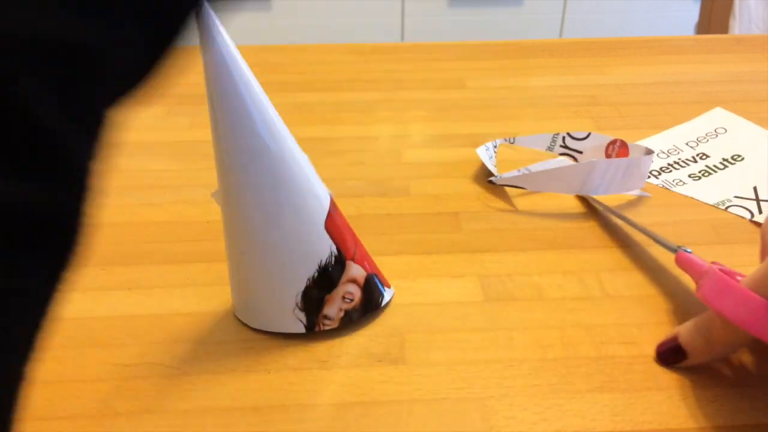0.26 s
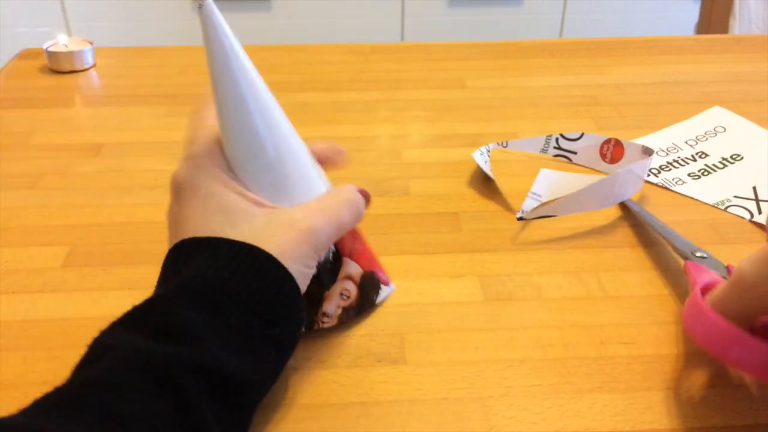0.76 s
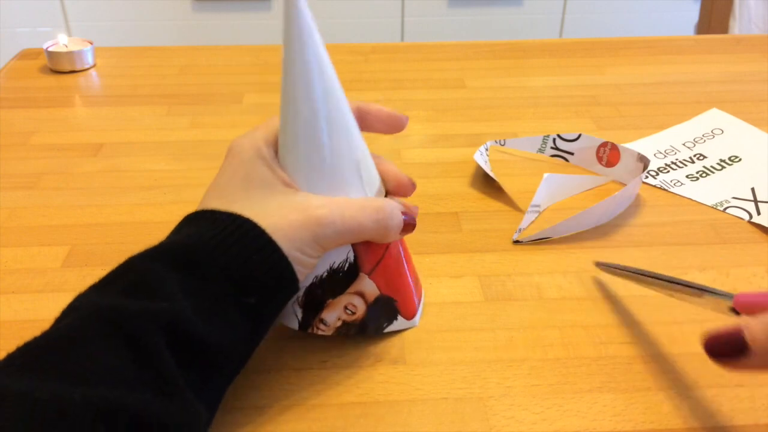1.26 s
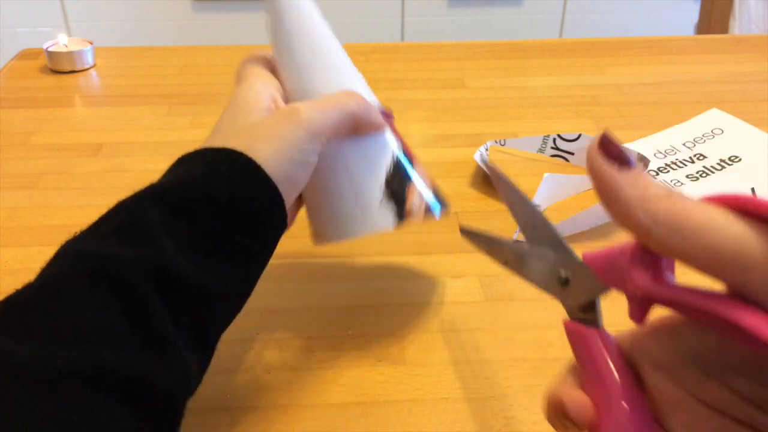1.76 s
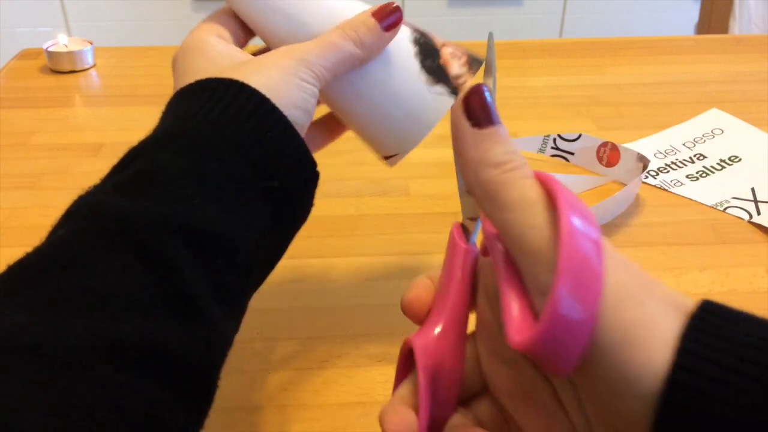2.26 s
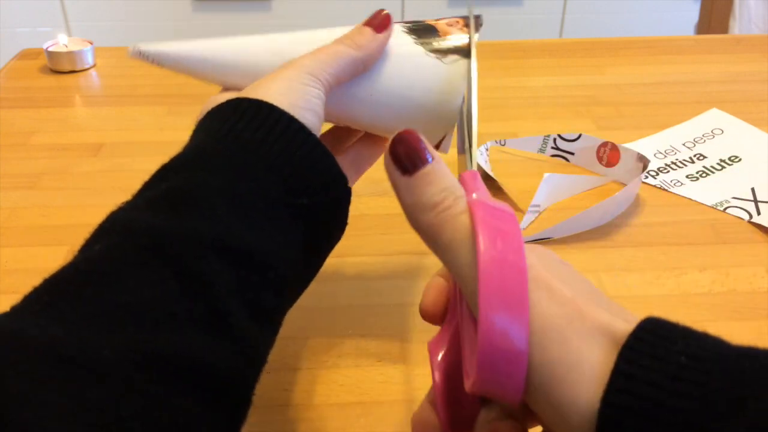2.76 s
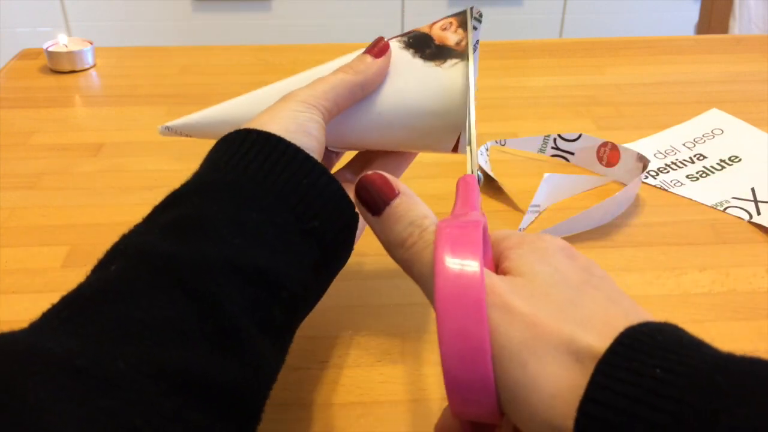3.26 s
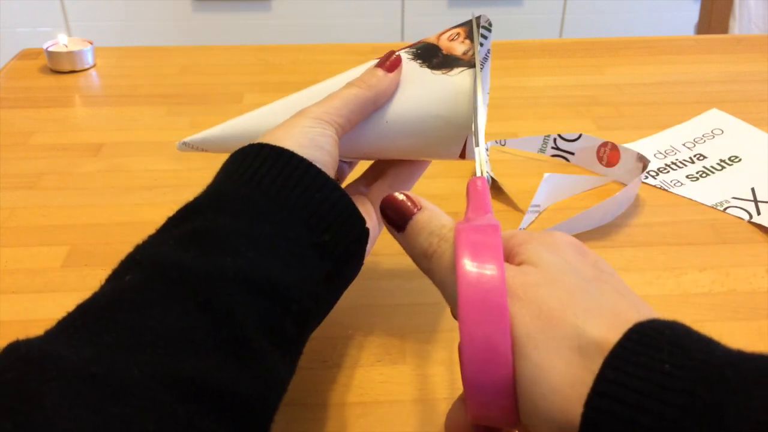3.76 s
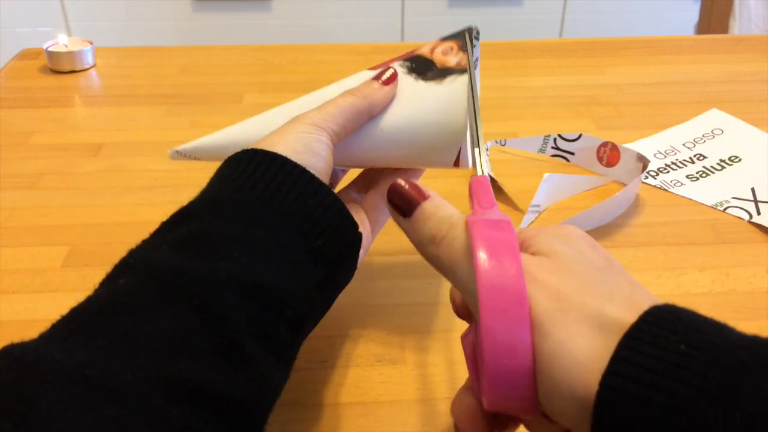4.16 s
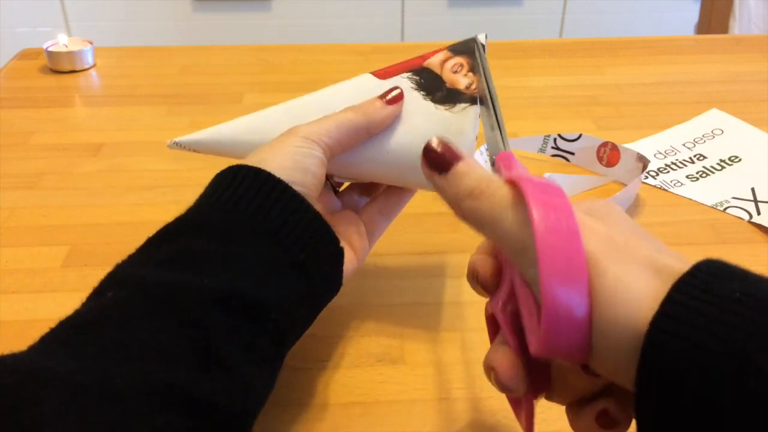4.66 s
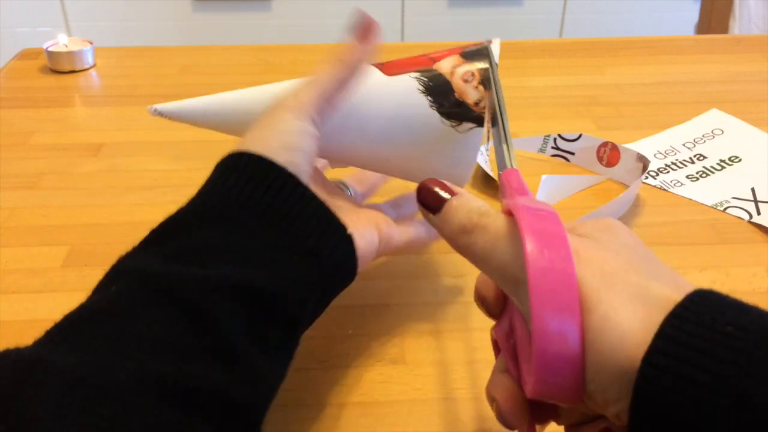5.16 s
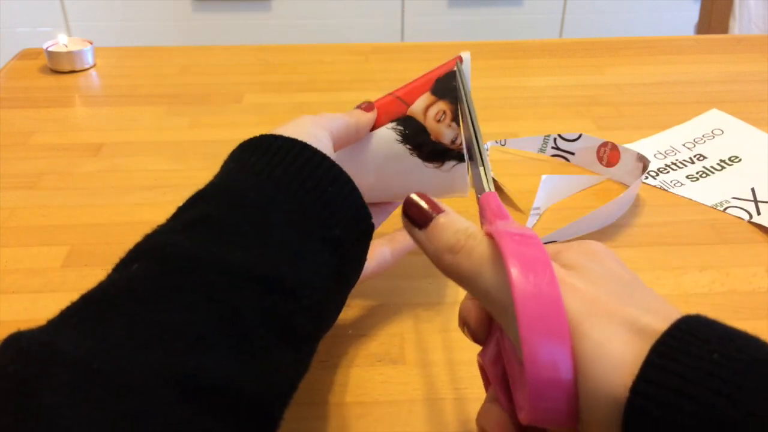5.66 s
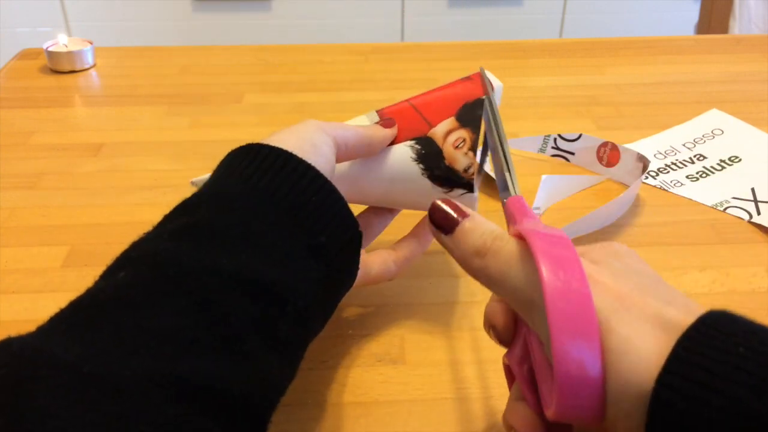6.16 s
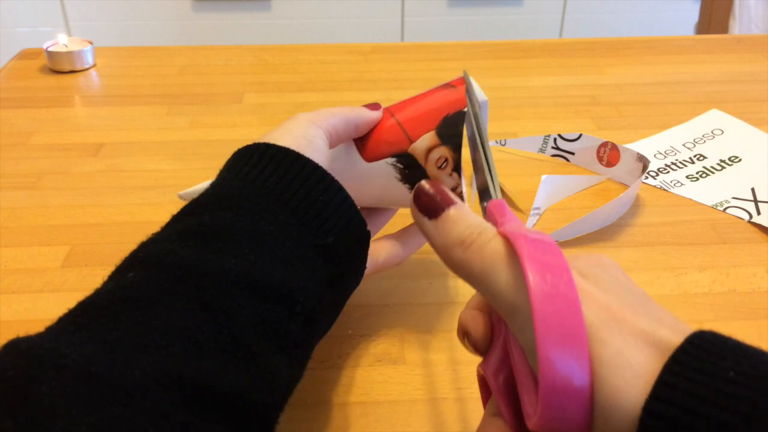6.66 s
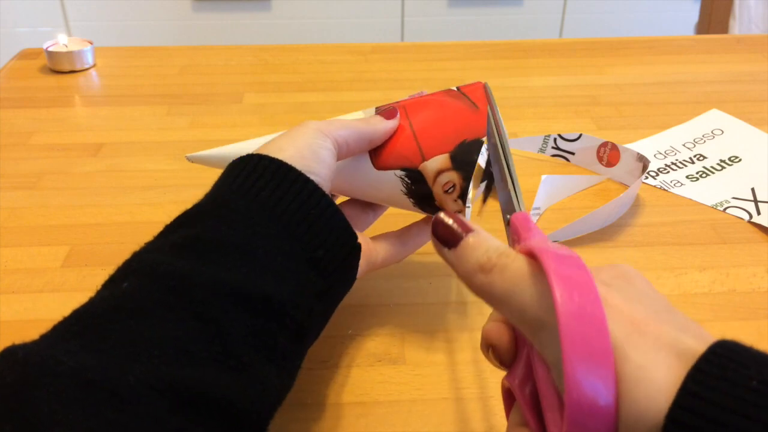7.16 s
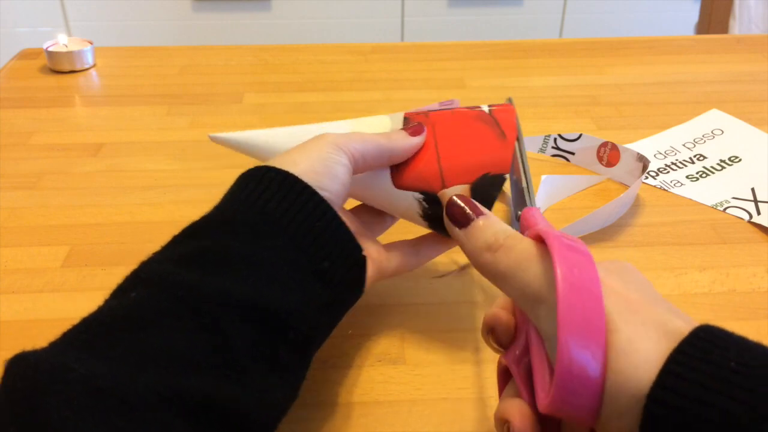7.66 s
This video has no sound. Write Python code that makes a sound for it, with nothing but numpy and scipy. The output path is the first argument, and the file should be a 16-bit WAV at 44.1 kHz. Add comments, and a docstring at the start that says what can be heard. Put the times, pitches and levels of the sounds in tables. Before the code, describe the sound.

Scissors crunch and snap in uneven bursts through a rolled paper cone, with hollow papery pops and faint blade rasps in a small quiet room.

```python
"""Large scissors trim the rim of a paper cone, close by in a small room, after it is picked up from a wooden table.
Each cut is a run of crunching slips and loud snaps: bursts of random clicks, each with a pop of the cone.
Between cuts the blades slide with a soft rasp: finer random clicks that ring the steel and the cone.
Sleeve and fingers brush the paper (crackling friction), bump it (short rings with a thud) and make it hum."""
import sys
import numpy as np
from scipy import signal
from scipy.fft import rfft, irfft
from scipy.io import wavfile

SR = 44100
rng = np.random.default_rng(int(sys.argv[2]) if len(sys.argv) > 2 else 0)


def dump_mix(stems):
    """Bounce the given channels to the path in sys.argv[1] as a 16-bit WAV at rate SR."""
    frames = np.atleast_2d(stems).T  # one column per channel
    limited = np.clip(frames, -1, 1)  # hard clip at full scale
    pcm = np.round(limited * 32767).astype(np.int16)
    wavfile.write(sys.argv[1], SR, pcm)


N = 348345


def from_db(db):
    """Turn decibels into a gain."""
    return 10 ** (np.asarray(db) / 20)


def rms_one(x):
    """Scale a sound to an average strength (rms) of 1."""
    return x / np.sqrt(np.mean(x ** 2) + 1e-20)


def at_hz(points, hz, axis=1):
    """Read one column of a table between its rows, along a logarithmic pitch axis."""
    table = np.array(points)
    return np.interp(np.log(np.maximum(hz, 1)), np.log(table[:, 0]), table[:, axis])


def add(track, start_s, sound):
    """Mix a short sound into a track."""
    i = max(0, round(start_s * SR))
    track[i:i + len(sound)] += sound[:max(0, N - i)]


def colour(x, spectrum, bright_db=0, size=4096):
    """Shape the spectrum without sounding early (minimum phase), tilted by bright_db per octave."""
    hz = np.arange(size // 2 + 1) * SR / size
    octaves = np.clip(np.log2(np.maximum(hz, 1) / 3600), -1.0, 1.2)   # the tilt levels off outside this range
    cepstrum = irfft(np.log(from_db(at_hz(spectrum, hz) + bright_db * octaves)))
    # folding the cepstrum puts all of the filter's response after the input
    cepstrum[1:size // 2] *= 2
    cepstrum[size // 2 + 1:] = 0
    response = irfft(np.exp(rfft(cepstrum)))
    return signal.oaconvolve(x, response)[:len(x)]


def resonate(x, hz, q):
    """Let through a narrow peak around one pitch."""
    return signal.lfilter(*signal.iirpeak(hz, q, fs=SR), x)


def butter(x, hz, kind):
    """Gentle second-order filter."""
    return signal.sosfilt(signal.butter(2, hz, kind, fs=SR, output="sos"), x)


def drift(rate):
    """Random curve with a spread of about 1: `rate` new values per second, joined by straight lines."""
    return np.interp(np.arange(N) * rate / SR, np.arange(N), rng.standard_normal(N))


def ring(x, hz, t60):
    """One resonance: a unit click sets off a sine of height 1 that dies by 60 dB in t60 seconds."""
    r, w = from_db(-60 / (t60 * SR)), 2 * np.pi * hz / SR
    return signal.lfilter([0, np.sin(w)], [1, -2 * r * np.cos(w), r * r], x + 1e-18)


def grains(per_s, spread_db, size):
    """Tiny slips and fibre breaks: random clicks of uneven strength."""
    strength = from_db(spread_db * np.minimum(rng.exponential(1, size), 4))
    happens = rng.random(size) < per_s / SR
    return happens * strength * rng.choice([-1, 1], size)


CRINKLE_DB, CRINKLE_PER_S = 4, 45   # the paper's colour shifts as it flexes: spread, new values per second
SNAGS_PER_S, SNAG_DB = 110, -3.5   # the paper's edge crackles under the brushing hand


def crinkle(count=12):
    """Dense grains of friction with a few snags; each band swells and sinks on its own."""
    out = np.zeros(N)
    edges = np.geomspace(200, 16000, count + 1)
    snags = from_db(SNAG_DB) * rms_one(grains(SNAGS_PER_S, 2.0, N))
    friction = [rms_one(grains(5000, 2.9, N)) + snags for _ in range(2)]
    for k, band in enumerate(zip(edges, edges[1:])):
        flex = from_db(CRINKLE_DB * np.clip(drift(CRINKLE_PER_S), -2, 2))
        out += flex * butter(friction[k % 2], band, "band")   # neighbouring bands use different grains
    return out


BRUSH_ATTACK_S, BRUSH_FADE_DB_PER_S, BRUSH_RELEASE_S = 0.00068, 16, 0.037   # the hand lands, slows down, lifts
BRUSH_RING_DB, BRUSH_Q = 7.5, 5.7
SLEEVE_DB, SLEEVE_STOPS_S = -55.5, 1.66   # faint rustle for as long as the arm is moving
# colour of rustling paper: (frequency [Hz], level [dB per Hz])
RUSTLE_SPECTRUM = [(150, -22), (450, 6), (850, 11.5), (1500, 5.5), (5000, 0), (8000, -0.5), (15000, -4)]
# sleeve and fingers brush the paper, whose pitch depends on the spot:
# (start [s], length [s], level [dB], pitch [Hz], tilt [dB per octave])
BRUSH_STROKES = [(0, 0.068, -38, 5170, 1), (0.37, 0.044, -52.5, 3740, -3.5), (0.863, 0.039, -33, 4100, 2),
                 (1.021, 0.2, -41, 2260, 3), (2.114, 0.027, -55, 8750, 3), (2.492, 0.012, -51.5, 4100, 1.5),
                 (2.758, 0.042, -46.5, 1980, -1), (3.15, 0.025, -53, 1980, 2),
                 (5.359, 0.016, -45.5, 5000, 0.5)]


def brushing():
    """Cloth and skin catch on the paper; each stroke has its own ring and fades as the hand slows."""
    friction = crinkle()
    arm_moves = np.clip((SLEEVE_STOPS_S - np.arange(N) / SR) / BRUSH_RELEASE_S, 0, 1)
    out = rms_one(colour(friction, RUSTLE_SPECTRUM)) * from_db(SLEEVE_DB) * arm_moves
    t = np.arange(SR // 2) / SR
    loudest_db = max(row[2] for row in BRUSH_STROKES)
    for start, length, db, hz, tilt_db in BRUSH_STROKES:
        piece = friction[max(0, round(start * SR)):][:len(t)]
        rub = colour(piece, RUSTLE_SPECTRUM, tilt_db)
        rub = rub + from_db(BRUSH_RING_DB) * resonate(rub, hz, BRUSH_Q)
        attack_s = BRUSH_ATTACK_S * from_db(loudest_db - db)   # lighter touches land more gently
        lift = np.exp(-np.maximum(t - length, 0) / BRUSH_RELEASE_S)
        contact = (1 - np.exp(-t / attack_s)) * lift
        add(out, start, rms_one(rub) * contact * from_db(db - BRUSH_FADE_DB_PER_S * t))
    return out


def fidgeting(db=-68):
    """The grip shifts all the time: faint clusters of crackles in the paper."""
    creaks = grains(1600, 6.4, N) * from_db(8.0 * np.clip(drift(22), -2, 2))
    return from_db(db) * rms_one(colour(creaks, RUSTLE_SPECTRUM))


AIR_DB = -59   # before the rumble swells and sinks
# colour of the quiet room noise: (frequency [Hz], level [dB per Hz])
AIR_SPECTRUM = [(25, -19), (55, -3.5), (220, -4), (400, -10), (700, -21), (1050, -11), (1600, -21),
                (3500, -22), (15000, -27.5)]
# how the low rumble swells and sinks around its average: (time [s], level [dB])
RUMBLE_LEVELS = [(0.2, -60), (1.31, -68.5), (2.49, -68), (2.9, -76.5), (4.47, -64), (5.23, -75.5),
                 (6.5, -62.5), (7.02, -75.5)]


def air(waver_db=2.0):
    """Quiet room noise; its low rumble swells and sinks."""
    noise = from_db(AIR_DB) * rms_one(colour(rng.standard_normal(N), AIR_SPECTRUM))
    rumble = signal.sosfiltfilt(signal.butter(2, 280, fs=SR, output="sos"), noise)
    level_db = np.interp(np.arange(N) / SR, *np.transpose(RUMBLE_LEVELS))
    swell_db = level_db - level_db.mean()
    waver = waver_db * np.clip(drift(51), -2, 2)
    return noise + rumble * (from_db(swell_db + waver) - 1)   # minus the rumble already in the noise


CONE_ATTACK_S = 0.00071
# a slack grip lowers the pitch, lets the cone ring longer and thuds more
GRIP_HZ, KNOCK_T60_S = 790, 0.02   # pitch and ring time at a medium grip
SLACK_LENGTHENS = 0.96   # doublings of the ring time per octave down
# thud under a 0 dB ring at a medium grip [dB]; share of the ring's level; extra thud [dB per octave down]
THUD_DB, THUD_FOLLOWS, SLACK_THUD_DB = -32, 0.59, 21
# colour of a dull thud: (frequency [Hz], level [dB per Hz])
THUD_SPECTRUM = [(100, -24), (290, 4.5), (1300, -4.5), (1800, -11.5), (2800, -22), (15000, -31.5)]
# the cone bumps on table, fingers and blades; its pitch depends on the grip:
# (time [s], ring level [dB], pitch [Hz])
CONE_KNOCKS = [(.14, -8.5, 840), (.153, -16, 940), (.32, -28, 800), (0.671, -37.5, 796), (.686, -32.5, 810),
               (.756, -27.5, 800), (.787, -8, 720), (.7945, -8.5, 780), (.801, -7, 824), (.863, -18.5, 874),
               (1.153, -31, 1100), (1.814, -31.5, 1010), (2.391, -44.5, 900), (2.6419, -1.5, 1020),
               (2.997, -37, 1000), (3.403, -20.5, 870), (3.525, -29, 1040), (4.9805, -21, 900),
               (5.134, -19, 1180), (5.504, -33.5, 1140), (5.862, -19.5, 1033), (6.475, -24, 1105),
               (7.469, -17.5, 1150), (7.717, -12, 757), (7.757, -12, 1097)]


def knocks(size=6000):
    """A soft contact rings a damped mode of the cone and a weaker upper one over a dull thud."""
    out, t = np.zeros(N), np.arange(size) / SR
    touch = 1 - np.exp(-t / CONE_ATTACK_S)
    for s, ring_db, hz in CONE_KNOCKS:
        slack = min(np.log2(GRIP_HZ / hz), .45)   # octaves below the medium grip
        t60 = KNOCK_T60_S * 2 ** (SLACK_LENGTHENS * slack)
        modes = np.sin(2 * np.pi * hz * t) + from_db(-27.5) * np.sin(2 * np.pi * 2.05 * hz * t)
        ringing = from_db(ring_db) * modes * from_db(-60 * t / t60)
        thud_db = THUD_DB + THUD_FOLLOWS * ring_db + SLACK_THUD_DB * slack
        thud = rms_one(colour(rng.standard_normal(size) * np.exp(-t / .004), THUD_SPECTRUM))
        add(out, s, touch * (ringing + from_db(thud_db) * thud))
    return out


CONE_T60_S = 0.018
# colour of tearing paper: (frequency [Hz], level [dB per Hz])
TEAR_SPECTRUM = [(170, -39), (420, -17), (800, -17), (1650, -13.5), (2100, -5), (2900, -5), (3800, -0.5),
                 (5500, -4), (7000, -5), (8200, -10.5), (10500, -9), (15000, -12)]


def bursts(rows, size=2048):
    """Crackle swells for a few ms around each burst, and the cone pops at its middle."""
    paper = np.zeros(N)
    age = np.arange(size) / SR
    t = age - age[size // 2]
    pop_shape = (1 - np.exp(-age / CONE_ATTACK_S)) * from_db(-60 * age / CONE_T60_S)
    for s, length, tear_db, pop_db, bright_db in rows:
        # a faint skirt of crackle surrounds each main burst
        main_burst = np.exp(-np.abs(t / (0.68 * length)) ** 2.3)
        swell = main_burst + from_db(-25) * np.exp(-np.abs(t / length))
        crackle = colour(grains(24000, 3.77, size) * swell, TEAR_SPECTRUM, bright_db)
        # the level holds for the burst itself, not for the silence around it
        add(paper, s + t[0], from_db(tear_db) * rms_one(crackle) * np.sqrt(0.5 * length * SR / size))
        # the cone bends in the hand, so every pop has a slightly different pitch
        pop_hz = cone_pitch(s) * (1 + .03 * rng.uniform(-1, 1))
        add(paper, s, from_db(pop_db) * pop_shape * np.sin(2 * np.pi * pop_hz * age))
    return paper


TICK_POP_DB = -10   # pop relative to the click
# light clicks and short scrapes of the scissors, nails and paper edge:
# (time [s], length [s], level [dB], tilt [dB per octave])
LIGHT_TICKS = [(1.018, 0.0018, -19.5, -1), (1.066, 0.0025, -30, -18), (1.5337, 0.0088, -32.5, 10),
               (1.583, 0.013, -39, 11.5), (1.601, 0.0031, -29.5, 16), (3.526, 0.0023, -30.5, 0),
               (3.809, 0.00086, -28, 5), (3.8922, 0.0058, -33, -3), (4.89, 0.0022, -35, -6.5),
               (4.982, 0.0024, -24, -3), (5.013, 0.0022, -27.5, -1.5), (6.2212, 0.0015, -32, 10),
               (7.2148, .0022, -23.5, -3), (7.222, 0.0011, -18, -5.5), (7.243, 0.0027, -24, -1.5),
               (7.302, 0.0065, -32.5, -1), (7.614, 0.0017, -33, -1)]


def ticks():
    """Light clicks and scrapes, each a small burst with a weaker pop."""
    return [(s, length, db, db + TICK_POP_DB, tilt_db) for s, length, db, tilt_db in LIGHT_TICKS]


HUM_RELEASE_S, HUM_SCUFF_DB = 0.01, -16   # the finger lets go; level of the scuffing before the hum's own
# a fingertip drags on the cone and makes it hum:
# (time [s], level [dB], pitch [Hz], swell [s], octave level [dB])
FINGER_HUMS = [(1.174, -24.5, 518.4, 0.0083, -3.5), (2.796, -35, 514, 0.0062, 4.5),
               (3.165, -40, 491.4, 0.008, -1.5)]


def hums(size=10000):
    """Stick and slip of a fingertip swells the cone's low mode and its octave, with some scuffing."""
    out, t = np.zeros(N), np.arange(size) / SR
    for s, db, hz, swell_s, octave_db in FINGER_HUMS:
        phase = 2 * np.pi * hz * t + 0.55 * drift(281)[:size]
        tone = np.sin(phase) + from_db(octave_db) * np.sin(2 * phase)
        scuff = from_db(HUM_SCUFF_DB) * rms_one(colour(rng.standard_normal(size), THUD_SPECTRUM))
        let_go = np.exp(-np.maximum(t - 2 * swell_s, 0) / HUM_RELEASE_S)
        drag = np.minimum(t / swell_s, 1) * let_go
        add(out, s, from_db(db) * (tone + scuff) * drag)
    return out


BLADE_Q = 10.4
# blades and cone resonate at pitches that change with how the blades are open and what they press on:
# (start [s], blade pitch [Hz], blade gain [dB], cone pitch [Hz])
BLADE_AND_CONE_PITCHES = [(1.5, 2400, 22.5, 1100), (3.3, 2080, -2, 1080), (3.9, 5140, 6, 1020),
                          (4.5, 3880, 2, 1130), (4.95, 2720, 3, 1197), (6.2, 4570, -14, 1110),
                          (7.6, 3600, -7, 1220)]


def cone_pitch(s):
    """Pitch of the cone in the latest row; before the first row, that of the first."""
    rows = BLADE_AND_CONE_PITCHES
    return next((hz for start, _, _, hz in rows[::-1] if start <= s), rows[0][-1])


def blade_colour(paper):
    """The paper shakes the blades, which answer with their resonance of the moment."""
    out, t = paper.copy(), np.arange(N) / SR
    ends = [row[0] for row in BLADE_AND_CONE_PITCHES[1:]] + [np.inf]
    for (start, hz, db, _), end in zip(BLADE_AND_CONE_PITCHES, ends):
        active = (t >= start) & (t < end)
        out += from_db(db) * resonate(paper * active + 1e-18, hz, BLADE_Q)
    return out


SLIP_EVERY_S = .014   # rounded to fit whole slips into each crunch
SLIP_LENGTH_S, SLIP_POP_DB, SLIP_BRIGHT_DB = 0.006, 2, -4   # pop relative to the tear; tilt per octave
SLIP_SPREAD_DB = 2   # no two slips are equally strong: up to this much either way
# the blades crunch through the paper in stick and slip:
# (start [s], end [s], first tear level [dB], last tear level [dB])
CRUNCH_RUNS = [(3.831, 3.8473, -24, -31), (3.9545, 3.98, -25.5, -27), (6.2747, 6.2845, -21.5, -22)]


def crunches():
    """Under steady pressure the blades slip forward at an even rate, tearing a few fibres each time."""
    rows = []
    for start, end, first_db, last_db in CRUNCH_RUNS:
        count = 1 + round((end - start) / SLIP_EVERY_S)
        uneven_db = SLIP_SPREAD_DB * rng.uniform(-1, 1, count)
        levels = np.linspace(first_db, last_db, count) + uneven_db
        for s, db in zip(np.linspace(start, end, count), levels):
            rows.append((s, SLIP_LENGTH_S, db, db + SLIP_POP_DB, SLIP_BRIGHT_DB))
    return rows


SNAP_BRIGHT_DB = -2.23   # per octave
# the paper gives way at once: (time [s], length [s], tearing level [dB], cone pop level [dB])
PAPER_SNAPS = [(3.997, 0.0054, -23.5, -34), (4.0127, 0.0029, -11, -28), (4.024, 0.0021, -17.5, -21),
               (4.0429, 0.0026, -8.5, -15), (4.526, 0.0059, -18, -18), (4.544, 0.003, -9.5, -17),
               (4.57, 0.0017, -11.5, -12.5), (5.0556, 0.0028, -2.5, -2.5), (6.267, 0.0059, -15, -10.5),
               (6.298, 0.0054, -16.5, -21), (6.305, 0.002, -6.5, -6), (7.1988, 0.0045, -17.5, -13),
               (7.272, 0.0016, -19.5, -22.5), (7.7136, 0.0053, -22.5, -8.5), (7.7174, 0.0028, -2, -7)]


def snaps():
    """The paper gives way at once, in a burst of crackle with a pop of the cone."""
    return [(*row, SNAP_BRIGHT_DB) for row in PAPER_SNAPS]


CATCH_DB, CATCH_S, SLIDE_FADE_DB = 11.5, 0.013, -1.5   # the edges catch at first, then run ever more lightly


def stroke(start, end, edge_s):
    """Contact pressure of one slide: it grips within edge_s, catches briefly, fades and lets go."""
    pressure = np.zeros(N)
    t = np.arange(start - 4 * edge_s, max(start, end) + 8 * edge_s, 1 / SR)
    grip = (1 + np.tanh((t - start) / edge_s)) / 2
    release = (1 + np.tanh((end - t) / (2 * edge_s))) / 2
    catch_db = CATCH_DB * np.exp(-np.maximum(t - start, 0) / CATCH_S)
    fade_db = np.interp(t, [start, end], [0, SLIDE_FADE_DB])
    add(pressure, t[0], grip * release * from_db(catch_db + fade_db))
    return pressure


SLIDE_ROUGH_DB, SLIDE_WAVER_DB = 3, 1.6   # quick stick and slip; unsteady hand
# the resonances shift with the point of contact: share of their pitch, new values per second
STEEL_WANDER, STEEL_WANDER_PER_S = 0.023, 40
# colour of the rasping edges: (frequency [Hz], level [dB per Hz])
RASP_SPECTRUM = [(200, -19), (500, -0.5), (2050, -0.5), (3200, -4.5), (5500, -9), (8000, -7.5), (15000, -4)]
# resonances of the blades while they press on each other: (pitch [Hz], level [dB], time to die by 60 dB [s])
PRESSED_BLADES = [(2050, -8, 0.015), (4180, -1.5, 0.0056), (5800, -8.5, 0.0085)]
# blade slides on blade; levels are before the catch and fade:
# (start [s], end [s], grip [s], rasp level [dB], relative pitch of the steel [ratio], cone resonance level [dB])
BLADE_SLIDES = [(4.274, 4.415, 0.0024, -44, 0.98, -48), (4.806, 4.826, 0.013, -35.5, 1.02, -38),
                (5.612, 5.73, 0.0011, -60, 1.23, -53.5), (5.855, 5.911, 0.006, -51, .96, -52),
                (5.951, 6.087, 0.011, -53.5, 0.953, -55), (6.697, 6.909, 0.0018, -47.5, 1.04, -46),
                (7.476, 7.563, 0.014, -41, 0.99, -44)]


def sliding():
    """The edges rasp over each other in tiny slips that ring the blades and the paper resting on them."""
    out = np.zeros(N)
    unsteady = from_db(SLIDE_ROUGH_DB * drift(260) + SLIDE_WAVER_DB * drift(40))
    slips = grains(5000, 3.5, N) * unsteady
    rasp = rms_one(colour(grains(8240, 1.5, N) * unsteady, RASP_SPECTRUM))
    cone = rms_one(ring(slips, 1104, 0.0096))
    # reading the steel slightly faster or slower bends its pitch
    wander = np.arange(N) + STEEL_WANDER * np.cumsum(drift(STEEL_WANDER_PER_S))
    for start, end, grip_s, db, pitch, cone_db in BLADE_SLIDES:
        steel = np.zeros(N)
        for hz, mode_db, t60 in PRESSED_BLADES:
            steel += from_db(mode_db) * rms_one(ring(slips, hz * pitch, t60))
        steel = np.interp(wander, np.arange(N), steel)
        blades = from_db(db) * rms_one(rasp + steel)
        out += stroke(start, end, grip_s) * (blades + from_db(cone_db) * cone)
    return out


# free modes of the steel blades: (pitch [Hz], level [dB], time to die by 60 dB [s])
FREE_BLADES = [(2540, -1, 0.25), (2730, -0.5, 0.27)]
# the blades snap fully shut: (time [s], level [dB])
BLADE_CLOSINGS = [(5.051, -30.5), (7.72, -40.5)]


def closings():
    """The blades meet with a jolt that rings their free steel."""
    jolts = np.zeros(N)
    for s, db in BLADE_CLOSINGS:
        add(jolts, s, from_db([db]))
    return sum(from_db(db) * ring(jolts, hz, t60) for hz, db, t60 in FREE_BLADES)


def cutting():
    """Tearing and popping paper, and the ring of the blades when they meet."""
    return blade_colour(bursts(snaps() + crunches() + ticks())) + closings()


# the room: (frequency [Hz], echo level [dB], time to die by 60 dB [s])
ROOM_ECHO = [(151, -12, 0.32), (520, -6.5, 0.45), (1066, -8.5, 0.35), (1754, -6.5, 0.36), (2880, -13, 0.31),
             (14080, -13.5, 0.29)]


def room(x, gap_s=.007, size=24000):
    """Diffuse reflections follow after a short gap; each band dies at its own rate."""
    t, response = np.arange(size) / SR, np.zeros(size)
    edges = np.geomspace(90, 17000, 15)
    for low, high in zip(edges, edges[1:]):
        hz = np.sqrt(low * high)
        band = butter(rng.standard_normal(size), [low, high], "band")
        tail = rms_one(band * from_db(-60 * t / at_hz(ROOM_ECHO, hz, axis=2)))
        # a wider band holds more energy for the same echo level
        response += from_db(at_hz(ROOM_ECHO, hz)) * tail * np.sqrt(2 * (high - low) / SR / size)
    out = np.zeros(N)
    add(out, gap_s, signal.oaconvolve(x, response))
    return out


def scene(low_cut_hz=140, count=3):
    """Hands, paper and scissors near the microphone, over the quiet air of the room."""
    handling = brushing() + fidgeting() + knocks() + hums() + sliding()
    # tearing paper sends a different crackle towards each wall, so its echo is diffuse
    cutting_echo = sum(room(cutting()) for wall in range(count)) / np.sqrt(count)
    echo = cutting_echo + room(handling)
    # the near sounds carry little deep bass
    sound = butter(cutting() + handling + echo, low_cut_hz, "high")
    return (sound + air())[None]


CUTOFF_HZ = 15350


def record(dry):
    """The loudest snaps overload the recorder; the deepest bass and the top are cut."""
    rounded = dry / (1 + dry ** 6) ** (1 / 6)
    centred = butter(rounded, 32, "high")
    return signal.sosfilt(signal.ellip(10, .1, 70, CUTOFF_HZ, fs=SR, output="sos"), centred)


dry = scene()
out = record(dry)
dump_mix(out)
```